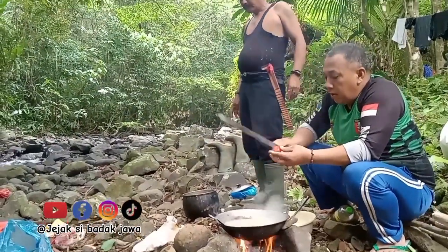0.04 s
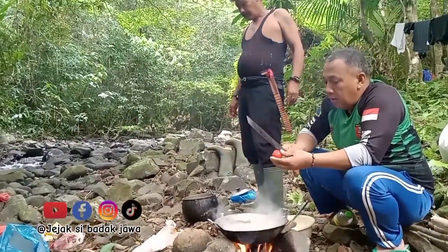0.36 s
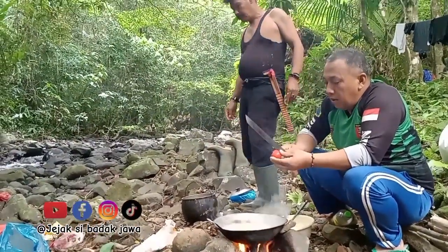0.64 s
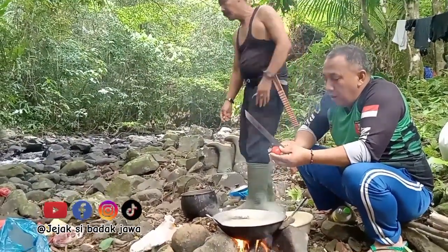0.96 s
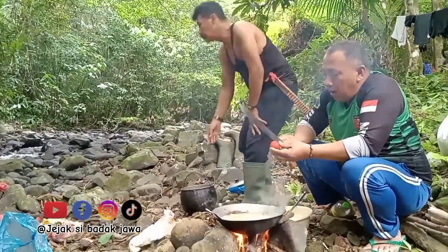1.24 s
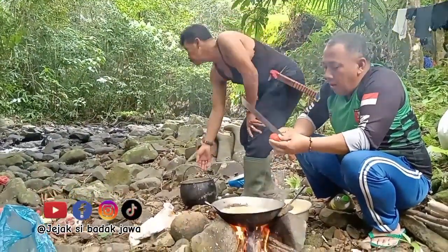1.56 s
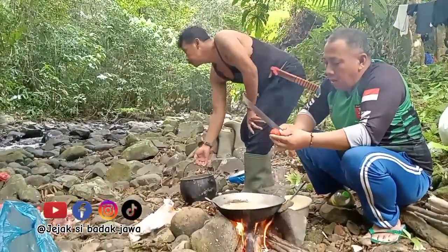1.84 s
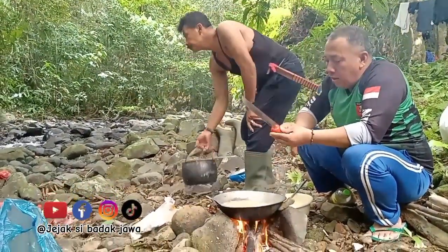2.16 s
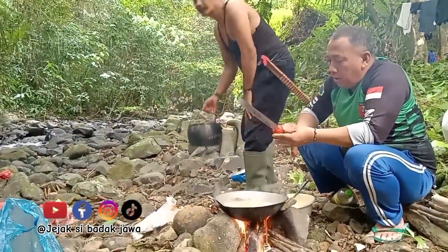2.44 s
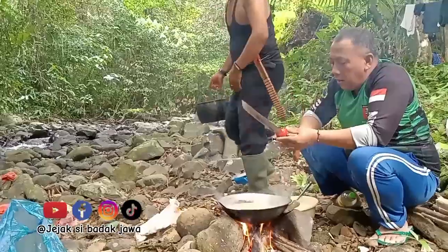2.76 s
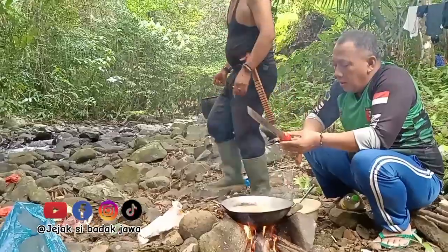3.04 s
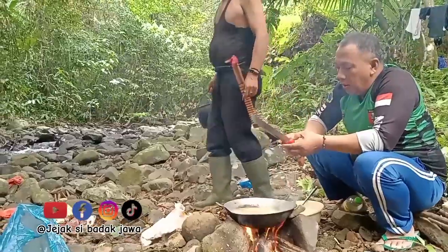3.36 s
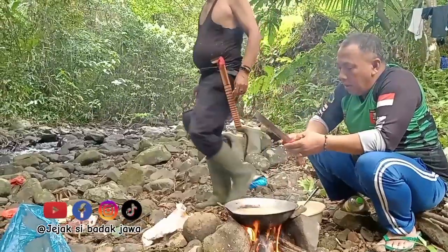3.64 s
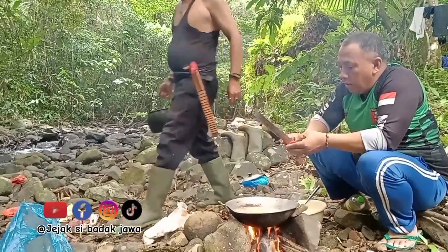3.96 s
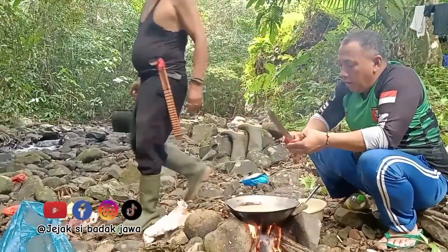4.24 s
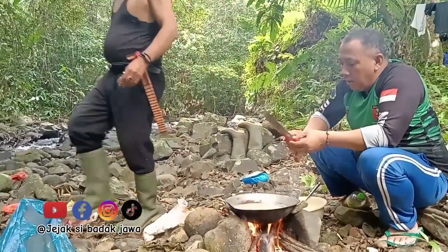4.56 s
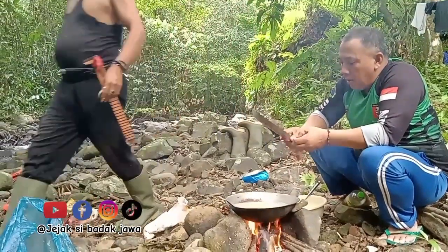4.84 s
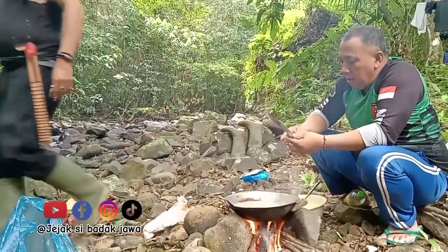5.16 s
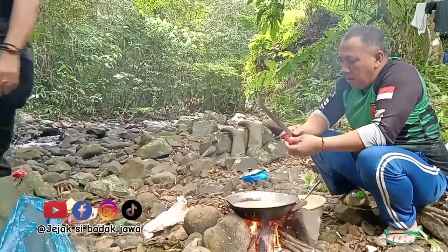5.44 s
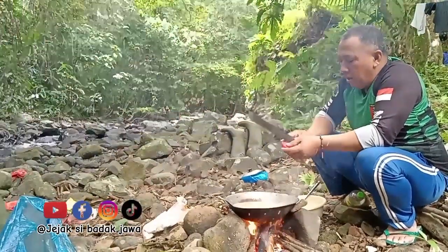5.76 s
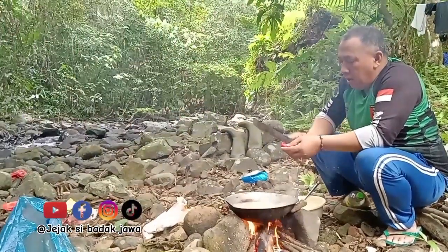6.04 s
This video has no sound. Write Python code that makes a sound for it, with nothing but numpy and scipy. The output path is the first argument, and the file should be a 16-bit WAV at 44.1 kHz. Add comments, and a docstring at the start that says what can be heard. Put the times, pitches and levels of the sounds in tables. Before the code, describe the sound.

Steady rushing creek water behind a ticking wood fire, with scuffing steps on stones and a single close, woody snap near the end.

```python
"""One microphone beside a shallow forest stream. Throughout, water rushes over the rocks in a patchy
wash with fine splashes, high hiss and hollow gurgles, and a cooking fire crackles and ticks in front.
From the first half second on, stones scuff and click underfoot and a few dull thumps pass; rough hollow
knocks come near 3 s. At about 5.4 s the level dips briefly and one sharp crack, close by, is thrown
back by the ground and the trees. The stream sinks a little under the last ticks."""
import sys
import numpy as np
from scipy import signal
from scipy.fft import rfft, irfft, next_fast_len
from scipy.io import wavfile
from scipy.ndimage import uniform_filter1d, map_coordinates

SR = 44100
rng = np.random.default_rng(int(sys.argv[2]) if len(sys.argv) > 2 else 0)


def dump(signal):
    """Clip the signal to [-1, 1] and save it as 16-bit WAV at the path in sys.argv[1]."""
    limited = np.clip(np.atleast_2d(signal).T, -1, 1)
    pcm = np.round(limited * 32767).astype(np.int16)
    wavfile.write(sys.argv[1], SR, pcm)


N = 277389

# slow drift of the stream's rush: (time [s], relative level [dB])
RUSH_DRIFT = [(0.0, -39), (1.37, -38), (3.92, -39), (5.26, -38), (5.5, -41), (6.29, -41.5)]
# the high hiss comes and goes on its own: (time [s], relative level [dB])
HISS_DRIFT = [(0.0, -51), (0.93, -52.5), (1.33, -47.5), (1.56, -52), (3.24, -51), (5.24, -51),
              (6.29, -53.5)]
# colour of the white water: (frequency [Hz], gain [dB])
WASH_SPECTRUM = [(25, -60.5), (60, -27.5), (120, -17.5), (300, -14.5), (800, -9.5), (1200, -9.5),
                 (1600, 0.5), (1900, 0.5), (2350, -3.5), (2850, -5), (3600, -8), (4300, -17), (6000, -38),
                 (10000, -75)]
# colour of the high hiss and tick splinters, with the microphone's peak near 6.3 kHz:
# (frequency [Hz], gain [dB])
HISS_SPECTRUM = [(2500, -17.5), (4200, -13.5), (5100, -7.5), (6000, -3.5), (6350, -1), (6700, -5.5),
                 (7500, -12), (7800, -9.5), (8200, -16.5), (8950, -23), (9200, -16.5), (9900, -33.5),
                 (11000, -39.5), (15500, -51)]
# hollows between the rocks that colour the gurgling: (frequency [Hz], gain [dB])
ROCK_HOLLOWS = [(100, 3), (240, 0), (314, -2), (385, 1), (477, -1.5), (570, 1.5), (685, 5.5), (790, 6.5),
                (1100, 1.5)]
# echo decay among the trees: (frequency [Hz], time to fall 60 dB [s])
FOREST_DECAY = [(200, 0.37), (1000, 0.22), (3000, 0.6), (9000, 0.23)]
# gritty scuffs underfoot: (time of the middle [s], level [dB], pitch [Hz], half-length [s])
STONE_SCUFFS = [(0.346, -37, 2680, 0.026), (1.031, -41.5, 3180, 0.013), (1.202, -45, 1000, 0.17),
                (1.43, -45, 3050, 0.054), (1.728, -35.5, 1320, 0.023), (2.442, -45.5, 1070, 0.089),
                (2.195, -40.5, 3150, 0.016), (2.9, -40, 2880, 0.026), (3.277, -38.5, 1900, 0.045),
                (4.563, -41, 820, 0.088), (5.141, -32, 2330, 0.022), (5.957, -36.5, 1400, 0.033),
                (6.13, -42, 5600, 0.026)]
# dull thumps: (time [s], relative level [dB])
DULL_THUMPS = [(0.456, -28.5), (1.737, -44), (2.342, -30), (3.02, -30.5), (3.382, -26), (3.551, -32.5),
               (4.47, -40), (4.634, -32)]
# clearest ticks of fire and stones: (time [s], level [dB], pitch [Hz], relative splinter level [dB])
CLEAR_TICKS = [(0.4648, -23, 2840, -26), (1.0345, -21.5, 3230, -30), (1.4, -25, 2880, -20),
               (1.427, -27.5, 3270, -15), (1.4593, -24, 2040, -4), (3.1608, -24.5, 1850, -28),
               (3.4058, -26, 1247, -6), (3.877, -28, 1900, -20), (4.9082, -29, 1460, -13),
               (4.9814, -26.5, 1910, -16), (5.439, -32, 4400, -2), (5.9544, -23.5, 1290, -11),
               (6.114, -19.5, 3440, 0)]
# low gurgles and rough hollow knocks: (time [s], relative level [dB], starting pitch [Hz])
GURGLES_AND_KNOCKS = [(0.499, -50.5, 232), (1.553, -39, 660), (2.17, -45.5, 338.5), (2.549, -44, 291.5),
                      (2.884, -35, 660), (3.0, -38, 712), (3.183, -38.5, 888), (3.291, -47, 273),
                      (3.45, -48, 316), (3.669, -38, 657), (4.668, -47, 203)]
# the close crack: (time [s], relative level [dB])
CLOSE_CRACK = [(5.3572, 0)]
# colour of its snap: (frequency [Hz], gain [dB])
SNAP_SPECTRUM = [(40, -31), (200, 1), (450, 7), (1500, -0.5), (2500, -6.5), (3600, 3.5), (4500, -29),
                 (7000, -32), (9000, -54), (11000, -64)]
# its woody ring: (frequency [Hz], relative level [dB], time to fall 60 dB [s])
RING_MODES = [(484, -5.5, 0.021), (680, -44, 0.031), (998, -11.5, 0.074), (1360, -1, 0.04),
              (1977, 10.5, 0.0074), (2460, 5, 0.015), (2760, 3.5, 0.017), (3770, -24, 0.012),
              (5340, -19, 0.015), (7120, -24, 0.033)]


def amp(db):
    """Decibels to gain."""
    return 10 ** (np.asarray(db) / 20)


def unit(x):
    """Scaled to rms 1."""
    return x / np.sqrt(np.mean(x ** 2) + 1e-20)


def along(points, hz):
    """(frequency [Hz], value) points read on a log axis."""
    freqs, values = np.transpose(points)
    return np.interp(np.log(hz + 1), np.log(freqs), values)


def curve(points):
    """(time [s], value) points read at every sample."""
    return np.interp(np.arange(N) / SR, *np.transpose(points))


def wobble(rate):
    """A smooth random curve, rate knots a second."""
    return map_coordinates(rng.standard_normal(int(N * rate / SR) + 4), [np.arange(N) * rate / SR])


def filtered(x, response):
    """x times a response of frequency."""
    size = next_fast_len(len(x) + SR // 4)
    return irfft(rfft(x, size) * response(np.fft.rfftfreq(size, 1 / SR)), size)[:len(x)]


def equalised(x, spectrum):
    """x through a (frequency [Hz], gain [dB]) curve."""
    return filtered(x, lambda hz: amp(along(spectrum, hz)))


def coloured(x, spectrum):
    """x equalised, at rms 1."""
    return unit(equalised(x, spectrum))


def pulse(spectrum, size=4096):
    """The shortest causal pulse with this spectrum, peak 1."""
    cepstrum = irfft(np.log(amp(along(spectrum, np.fft.rfftfreq(size, 1 / SR)))))
    cepstrum[1:size // 2] *= 2
    cepstrum[size // 2 + 1:] = 0
    wave = irfft(np.exp(rfft(cepstrum)))
    return wave / np.abs(wave).max()


def add(track, s, sound):
    """Mixes a sound into the track at s seconds."""
    start = max(round(s * SR), 0)
    track[start:start + len(sound)] += sound[:max(len(track) - start, 0)]


def patchy(depth_db, size=512):
    """Noise whose level varies in patches of time and pitch."""
    bands = signal.stft(rng.standard_normal(N), nperseg=size)[2]
    patches = uniform_filter1d(rng.standard_normal(bands.shape), size=6, axis=0)
    patches = uniform_filter1d(patches, size=10, axis=1)
    return signal.istft(bands * amp(depth_db * unit(patches)), nperseg=size)[1][:N]


def bubble(t, hz, cycles, rise):
    """A tone that rings for some cycles and rises in pitch, as a bubble does near the surface."""
    age = t * hz / cycles
    phase = 2 * np.pi * hz * t * (1 + rise * np.minimum(age, 2) / 2)
    return np.sin(phase) * amp(-60 * age) * (1 - np.exp(-20 * age))


def bubbles(per_s, low_hz, high_hz, cycles, spread_db, rise, size):
    """A swarm of bubbles of random time, pitch and strength, at rms 1."""
    when, pitch, strength, life = rng.random((int(per_s * N / SR), 4)).T[:, :, None]
    hz = low_hz * (high_hz / low_hz) ** pitch
    gain = amp(-spread_db * np.log(np.maximum(strength, .01)))
    k = np.arange(size)
    fade = np.minimum(1, 10 * (1 - k / size))
    rings = gain * bubble(k / SR, hz, cycles * (.5 + life), rise) * fade
    positions = (when * N).astype(int) + k
    return unit(np.bincount(positions.ravel(), rings.ravel(), N)[:N])


def stream():
    """White water is a wash thick with splashes; a hiss lies above, pockets gurgle between rocks."""
    rush_db, hiss_db = curve(RUSH_DRIFT), curve(HISS_DRIFT)
    gurgle_db = rush_db.mean() + 1.1 * (rush_db - rush_db.mean())
    surge_db = 0.1 * wobble(7.7) + 0.5 * wobble(35)  # random swells, slow and fast
    splashes = bubbles(per_s=1100, low_hz=898, high_hz=4304,
                       cycles=22.5, spread_db=3, rise=0.033, size=900)
    trickles = bubbles(per_s=240, low_hz=1002.3, high_hz=3885,
                       cycles=124, spread_db=2.5, rise=0.083, size=3000)
    wash = coloured(unit(patchy(depth_db=2.27)) + amp(-10.5) * splashes + amp(-10) * trickles,
                    WASH_SPECTRUM)
    fizz = bubbles(per_s=400, low_hz=4080, high_hz=8865, cycles=400, spread_db=3, rise=0.012, size=3000)
    hiss = coloured(unit(patchy(depth_db=2)) + amp(-8.5) * fizz, HISS_SPECTRUM)
    pockets = bubbles(per_s=190, low_hz=262, high_hz=1288, cycles=39.7, spread_db=3, rise=0.16, size=4000)
    bank_echo = amp(-4.5) * forest(pockets, build_s=0.0028)  # the banks blur each gulp
    gurgle = coloured(pockets + bank_echo, ROCK_HOLLOWS)
    return (amp(rush_db + 0.21 + surge_db) * wash
            + amp(hiss_db + 0.54 + 2.2 * surge_db) * hiss
            + amp(gurgle_db - 14.5) * gurgle)


def forest(x, build_s, size=256):
    """Echoes from trunks and leaves build up at the microphone and die away band by band."""
    hz, t, bands = signal.stft(rng.standard_normal(SR // 2), SR, nperseg=size)
    decay = amp(-60 * t / along(FOREST_DECAY, hz)[:, None])
    build = 1 - 1.73 * np.exp(-(t / build_s) ** 2)
    tail = signal.istft(bands * decay * build, SR, nperseg=size)[1]
    return signal.fftconvolve(x, tail / np.linalg.norm(tail))[:N]


def fire():
    """The cooking fire near the microphone gives many tiny dry crackles, 26 a second."""
    when, strength = rng.random((int(26 * N / SR), 2)).T
    gain = amp(-4 * np.log(np.maximum(strength, .03)))
    impulses = np.bincount((when * N).astype(int), gain, N)
    pop = pulse([(400, -30), (1800, -3), (3200, 0), (4400, -10),
                 (6400, -12), (8000, -20), (9500, -38), (11000, -65)])
    return amp(-40.5) * signal.fftconvolve(impulses, pop)[:N]


def faint_ticks(per_s=6.5, db=-29.5, spread_db=1.5, hz=2267, octaves=.45, splinter_db=-17):
    """Rows like those of CLEAR_TICKS, at random times and scattered in strength and pitch."""
    return [(when * N / SR, db + spread_db * (2 * strength - 1),
             hz * 2 ** (octaves * (2 * pitch - 1)), splinter_db)
            for when, strength, pitch in rng.random((int(per_s * N / SR), 3))]


def scuffs(grains_per_s=2500):
    """Underfoot, grit rubs on stone in short grainy swells."""
    out, t = np.zeros(N), np.arange(-SR // 5, SR // 5) / SR
    for s, db, hz, half_length in STONE_SCUFFS:
        grit = rng.standard_normal(len(t)) * (rng.random(len(t)) < grains_per_s / SR)
        rub = coloured(grit, [(hz / 4, -36), (hz * 0.63, -10), (hz, 0),
                              (hz * 1.35, -7), (hz * 1.85, -48), (hz * 7, -90)])
        add(out, s + t[0], amp(db) * rub * np.exp(-2 * (t / half_length) ** 2))
    return out


def thumps(start_hz=345, end_hz=56, fall_s=0.0089):
    """Each dull thump is a rough puff that drops in pitch and ends in a brief low boom."""
    out, t = np.zeros(N), np.arange(SR // 6) / SR
    hz = end_hz + (start_hz - end_hz) * np.exp(-t / fall_s)
    swell = np.exp(-((t - .009) / 0.0089) ** 2) * (1 - np.exp(-t / 0.0026))
    drop = swell * np.sin(2 * np.pi * np.cumsum(hz) / SR)
    boom = np.sin(2 * np.pi * 62 * t) * np.exp(-((t - .026) / 0.024) ** 2)
    puff_spectrum = [(40, -20), (130, -0.5), (380, -2.5), (600, -12), (1200, -53), (4000, -100)]
    for s, db in DULL_THUMPS:
        puff = swell * coloured(rng.standard_normal(len(t)), puff_spectrum)
        add(out, s, amp(db - 4.5) * (drop + amp(-4) * puff + amp(-12.5) * boom))
    return out


def ticks(ring_cycles=52):
    """Fire and stones tick nearby: a main mode and two weaker ones ring under a bright splinter."""
    out, t = np.zeros(N), np.arange(SR // 15) / SR
    attack = 1 - np.exp(-t / 0.00025)
    for s, db, hz, splinter_db in CLEAR_TICKS + faint_ticks():
        lower_hz, upper_hz = hz * np.array([.68, 1.42]) * np.exp(0.039 * rng.standard_normal(2))
        main, lower, upper = (np.sin(2 * np.pi * f * t) for f in (hz, lower_hz, upper_hz))
        ring = (main - 0.31 * lower - 0.19 * upper) * amp(-60 * t * hz / ring_cycles)
        splinter = coloured(rng.standard_normal(len(t)), HISS_SPECTRUM)
        splinter *= amp(splinter_db - 8 - 60 * t / 0.016)
        add(out, s + .0005, amp(db) * (ring + splinter) * attack)
    return equalised(out, [(7000, 0), (9000, -14), (11000, -38), (15000, -50)])


def gurgles_and_knocks():
    """Low gurgles and rough hollow knocks nearby: each a slightly rising tone with a ragged level."""
    out, t = np.zeros(N), np.arange(SR // 3) / SR
    for s, db, hz in GURGLES_AND_KNOCKS:
        rough = coloured(rng.standard_normal(len(t)), [(50, -1), (130, -9.5), (300, -38), (1000, -100)])
        add(out, s, amp(db) * (1.83 + 1.6 * rough) * bubble(t, hz, cycles=86, rise=0.066))
    return out


def crack(ground_delay_s=0.0019):
    """A close, hard snap with a short woody ring; the ground returns it and nearby stones scatter it."""
    out = np.zeros(N)
    snap = pulse(SNAP_SPECTRUM)
    t = np.arange(len(snap)) / SR
    ring = sum((-1) ** k * amp(db - 60 * t / t60) * np.sin(2 * np.pi * hz * t)
               for k, (hz, db, t60) in enumerate(RING_MODES))
    scatter_spectrum = [(40, -50), (120, -20), (300, 3.5), (600, 0.5),
                        (1500, -13), (4000, -11.5), (6500, -29), (9000, -51)]
    scatter = coloured(rng.standard_normal(len(t)), scatter_spectrum)
    scatter *= (1 - np.exp(-t / 0.0012)) * amp(-60 * t / 0.18)
    for s, db in CLOSE_CRACK:
        add(out, s, amp(db - 6) * snap + amp(db - 14) * ring + amp(db - 27.5) * scatter)
        add(out, s + ground_delay_s, amp(db - 9.5) * snap)
    return equalised(out, [(40, -22), (140, -0.5), (7400, 1), (8800, -11), (11000, -12.5)])


def scene():
    """From the microphone: the crack and small sounds in front, the stream behind, trees around."""
    close_crack = crack()
    near_sounds = ticks() + scuffs() + gurgles_and_knocks() + fire()
    echoes = forest(amp(-16) * close_crack + amp(-15) * near_sounds, build_s=0.021)
    return (stream() + thumps() + near_sounds + close_crack + echoes)[None]


def record(dry, bass_hz=30, top_hz=15700):
    """The level dips briefly just ahead of the crack; the microphone drops the deepest bass and top."""
    crack_s = CLOSE_CRACK[0][0]
    dip_db = curve([(crack_s - .025, 0), (crack_s - .022, -19), (crack_s - .015, -13), (crack_s, 0)])
    microphone = lambda hz: (1j * hz / (1j * hz + bass_hz)) ** 2 * (hz < top_hz)
    return filtered(dry[0] * amp(dip_db), microphone)[None]


dry = scene()
out = record(dry)
dump(out)
```